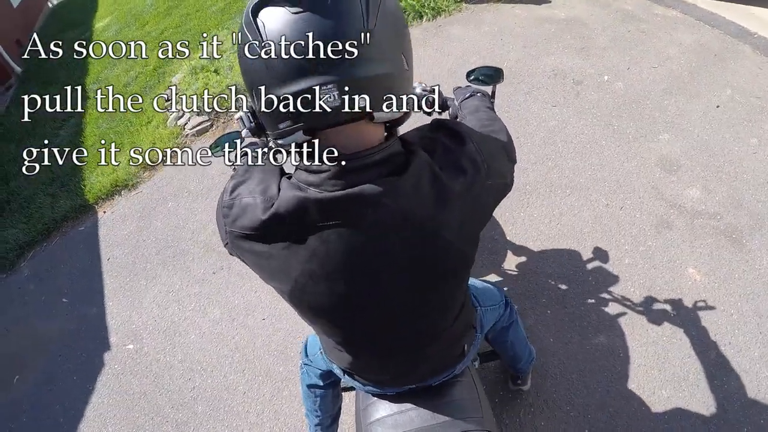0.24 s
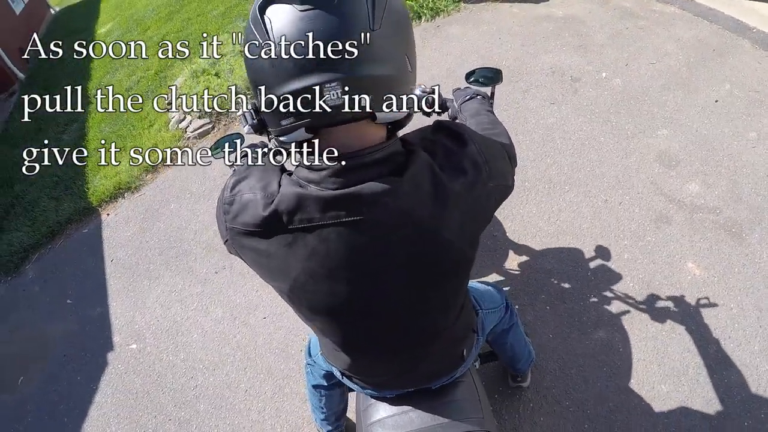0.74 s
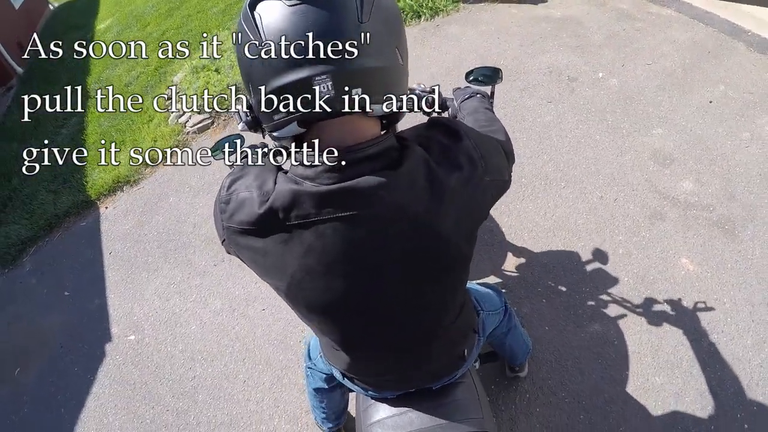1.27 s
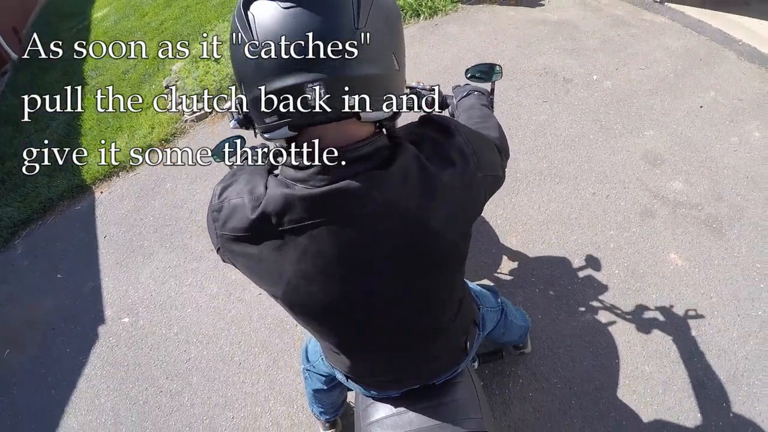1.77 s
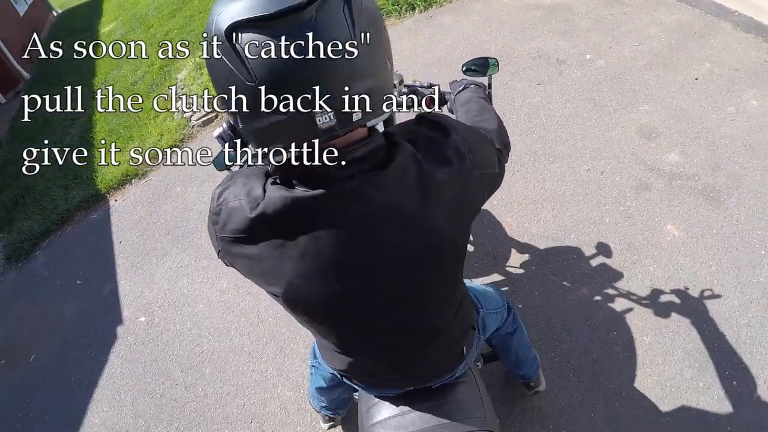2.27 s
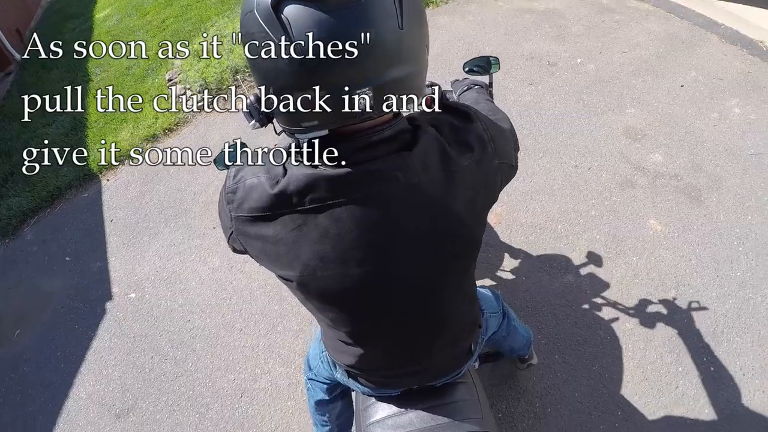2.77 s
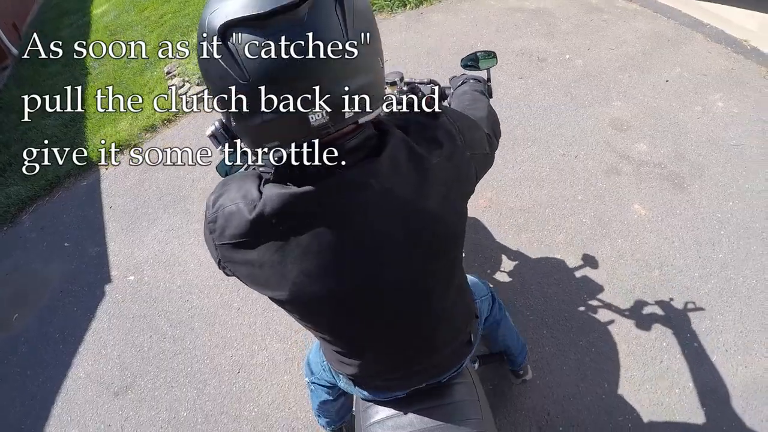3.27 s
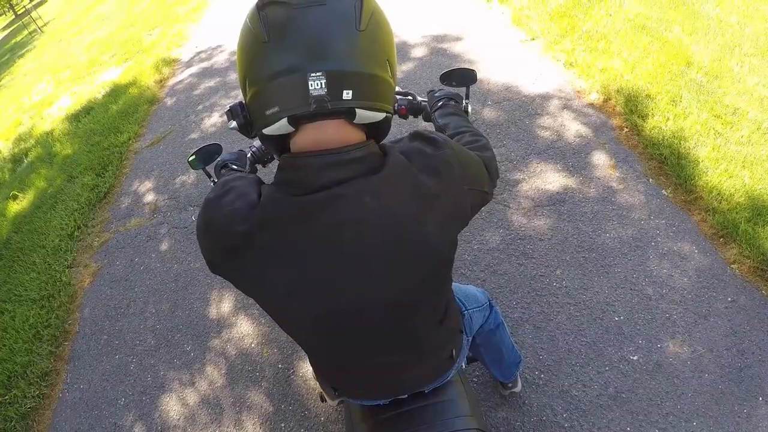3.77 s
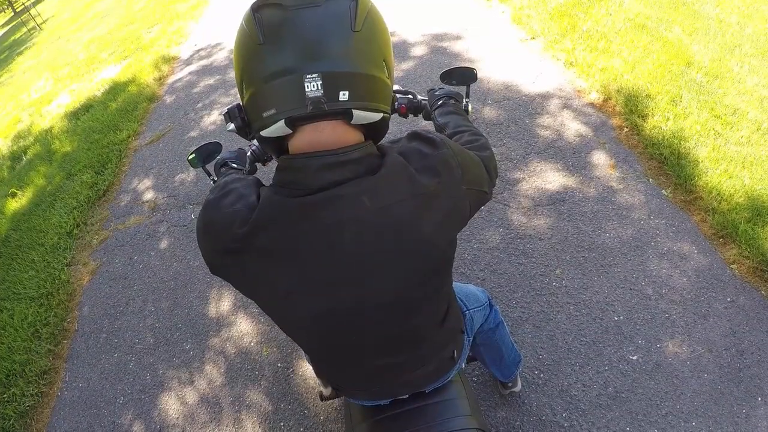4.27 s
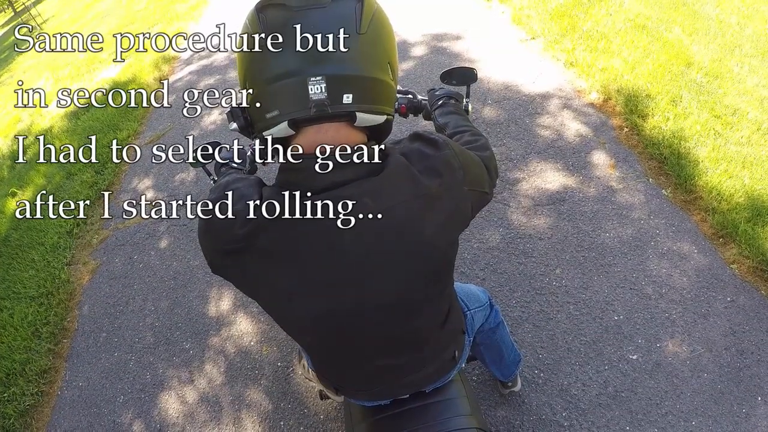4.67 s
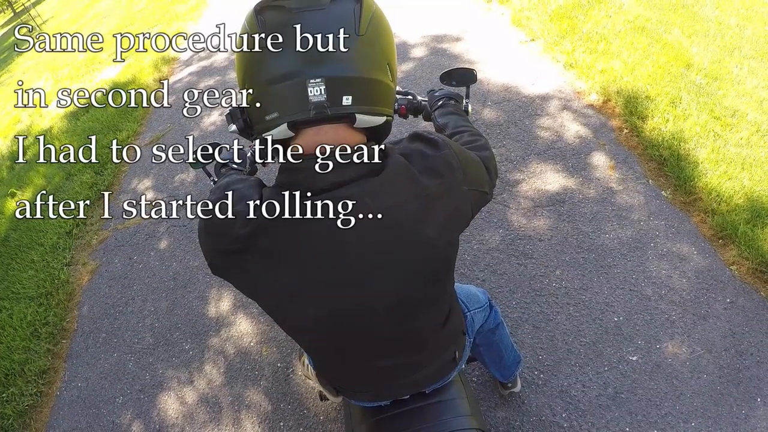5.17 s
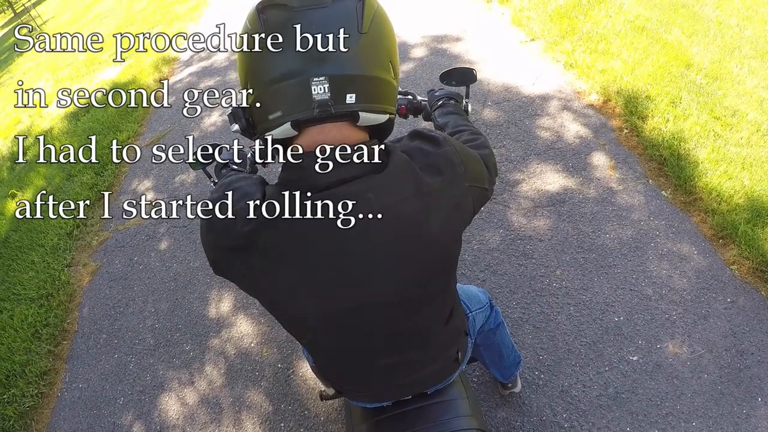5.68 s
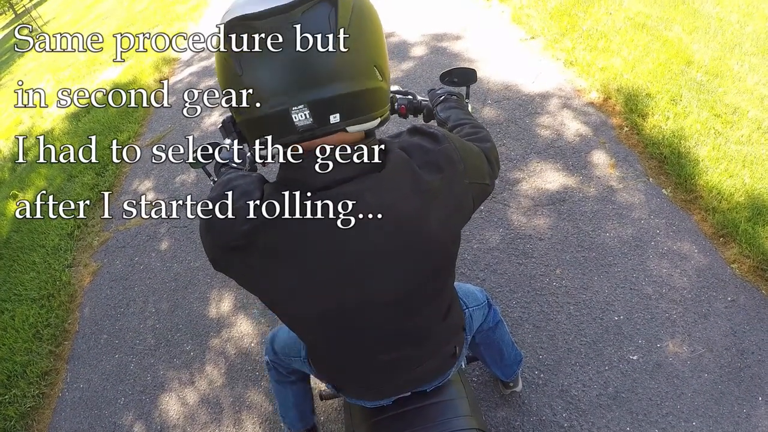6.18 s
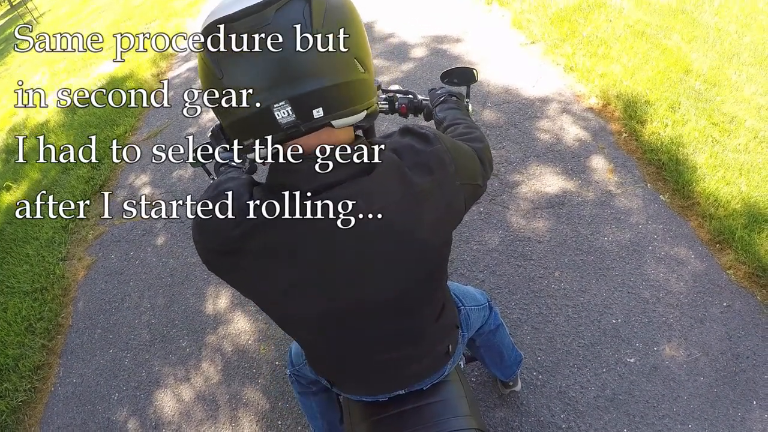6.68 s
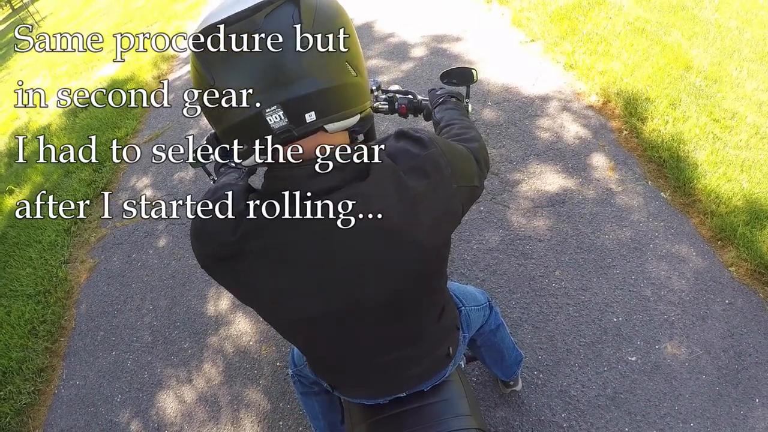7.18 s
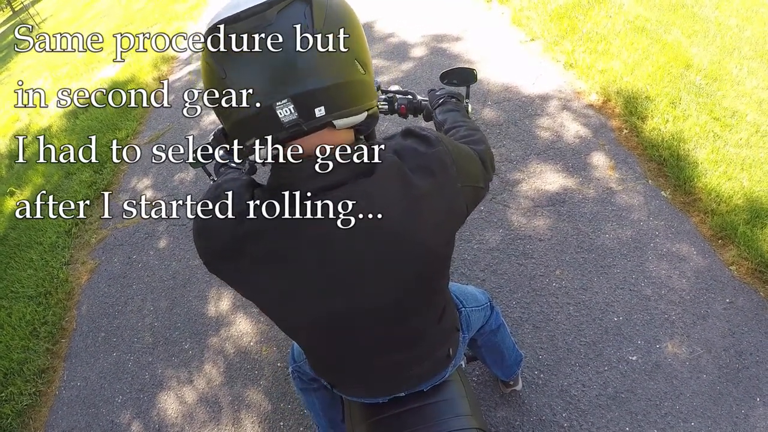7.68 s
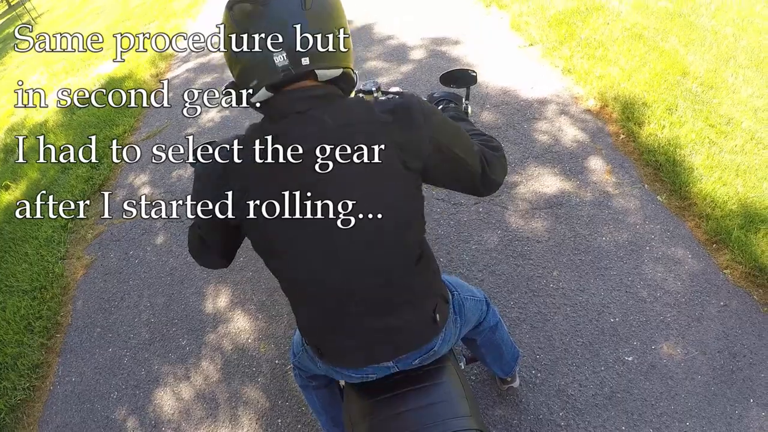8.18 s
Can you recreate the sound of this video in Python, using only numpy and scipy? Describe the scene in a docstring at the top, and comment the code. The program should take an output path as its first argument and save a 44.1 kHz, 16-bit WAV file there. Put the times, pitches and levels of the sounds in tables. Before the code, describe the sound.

Outdoors, a nearby motorcycle engine runs at a loud, lumpy idle, its low exhaust beats mixed with knocking and chain and valve clatter. It stops suddenly, leaving a much quieter stretch of coasting on asphalt, with soft tyre noise and low wind on the microphone. A handful of metallic gear clunks follow, one clearly harder than the rest, while distant birds whistle and trill. A few light, dry clicks come last.

```python
"""On an asphalt drive, a twin-cylinder motorcycle that has just caught idles lumpily, missing now and then.
Each firing excites the resonances of the exhaust; knocks, chain and valve gear set the metal ringing.
The scene cuts to the same machine rolling down the drive with its engine off: air rumbles on the
microphone, the tyres hiss softly, the gear lever clunks, birds call far off and the controls click."""
import sys
import numpy as np
from scipy import signal
from scipy.fft import rfft, irfft
from scipy.io import wavfile

SR = 44100
rng = np.random.default_rng(int(sys.argv[2]) if len(sys.argv) > 2 else 0)


def bounce(signal):
    """Save signal as a 16-bit WAV file at the path given by the first command-line argument."""
    frames = np.transpose(np.atleast_2d(signal))
    limited = np.clip(frames, -1, 1)
    pcm = np.round(limited * 32767).astype(np.int16)
    wavfile.write(sys.argv[1], SR, pcm)


N = 371746
CUT_S = 3.4802  # idling gives way to rolling
TIME = np.arange(N) / SR
BLOW = np.arange(16384) / SR  # time since a blow [s]

# The two cylinders, the weaker first:
# (thump level [dB], lag [s], moment of the drive's knock [share of stroke], knock over clatter [dB])
CYLINDERS = [(-3, .0016, .485, 21.5), (-1.4, .0005, .41, 16)]
# The engine gathers strength: (time [s], level [dB])
EFFORT = [(0, -1), (.4, -1), (1.6, 0.2), (1.9, 0.5)]
# Clatter of chain and valve gear: (time [s], level [dB])
CLATTER_LEVEL = [(.27, -52), (.36, -46), (.62, -48.5), (.8, -45.5), (3.45, -45)]
# Spectrum of the dead, non-resonant part of a blow: (frequency [Hz], relative level [dB])
THUD_SPECTRUM = [(150, 3), (450, 4), (1100, 3), (1600, 3.5), (2400, 7), (3000, -3.5), (3600, -8),
                 (4200, -21), (5800, -16.5), (8000, -30.5), (15000, -27.5)]


def amp(db):
    """Amplitude ratio: tenfold for every 20 dB."""
    return 10 ** (np.asarray(db) / 20)


def unit_rms(x):
    """Normalisation to a mean power of 1."""
    return x / np.sqrt(np.mean(x ** 2) + 1e-20)


def level(rows):
    """Gain envelope interpolated through (time [s], level [dB])."""
    return amp(np.interp(TIME, *np.transpose(rows)))


def add(mix, s, sound):
    """Superposition: a sound joins the mix at time s."""
    start = round(s * SR)
    sound = sound[max(-start, 0):]
    part = mix[max(start, 0):][:len(sound)]
    part += sound[:len(part)]


def excite(response, x):
    """A linear system driven by x: convolution with its impulse response, scaled to unit energy."""
    return signal.oaconvolve(x, response / np.linalg.norm(response))[:len(x)]


def colour(x, spectrum):
    """Minimum-phase filter of mean power gain 1, shaped by (frequency [Hz], relative level [dB])."""
    hz, db = np.transpose(spectrum)
    bin_hz = abs(np.fft.fftfreq(8192, 1 / SR))
    log_gain = np.log(amp(np.interp(np.log(bin_hz + 1), np.log(hz), db)))
    response = np.fft.ifft(np.exp(np.conj(signal.hilbert(log_gain)))).real
    return excite(response[:len(bin_hz) // 2], x)


def cutoff(x, hz, kind="low", order=2):
    """Butterworth filter: a flat passband that rolls off beyond hz."""
    return signal.sosfilt(signal.butter(order, hz, kind, fs=SR, output="sos"), x)


def bell_db(hz, centre, octaves):
    """Resonance-like hump, 6 dB down at the given octaves from its centre."""
    return -20 * np.log10(1 + (np.log2(hz / centre) / octaves) ** 2)


def band(x, centre, octaves):
    """Band-pass filtering by a bell-shaped spectrum."""
    hz = np.geomspace(100, 16000, 30)
    return colour(x, np.transpose([hz, bell_db(hz, centre, octaves)]))


def wander(hz):
    """Random fluctuation of rms 1: noise low-passed at hz."""
    spectrum = rfft(rng.standard_normal(N)) / (1 + (np.fft.rfftfreq(N, 1 / SR) / hz) ** 4)
    return unit_rms(irfft(spectrum, N))


def grainy_noise(depth_db, hz):
    """Random amplitude modulation gives white noise a grain."""
    return unit_rms(rng.standard_normal(N) * amp(depth_db * wander(hz)))


def burst(rise_s, decay_s):
    """A noise transient that swells, then decays exponentially."""
    return rng.standard_normal(len(BLOW)) * (1 - np.exp(-BLOW / rise_s)) * np.exp(-BLOW / decay_s)


def ring(hz, db, t60, glide=0):
    """Free decay of one damped mode, whose pitch rises by the fraction glide."""
    cycles = hz * (BLOW + glide * (BLOW - .03 * (1 - np.exp(-BLOW / .03))))
    return amp(db - 60 * BLOW / t60) * np.cos(2 * np.pi * cycles)


def strike(modes, contact_s, vary_db):
    """Impact excitation: modes swell during contact, then decay freely; no two blows are alike."""
    hz, db, t60 = np.transpose(modes)[:, :, None]
    strength, detune, phase = rng.standard_normal((3, len(modes), 1))
    t = BLOW[:len(BLOW) // 2]
    swell = np.sin(np.pi / 2 * np.minimum(t / contact_s, 1)) ** 2
    decay = amp(db + vary_db * strength - 60 * np.maximum(t - contact_s, 0) / t60)
    tones = np.sin(2 * np.pi * (hz * (1 + .008 * detune) * t + phase))
    return np.pad((swell * decay * tones).sum(0), (0, len(t)))


def crank():
    """Phase is the integral of rate: returns time and the count of strokes made by then."""
    # The idle hunts, then settles: (time [s], firing rate [1/s])
    speed = [(-0.045, 17.26), (0.05, 13.08), (0.14, 15.83), (0.26, 11.59), (0.37, 16.21), (0.55, 15.57),
             (0.62, 14.57), (0.87, 14.85), (0.97, 15.71), (1.13, 15.14), (1.25, 16.76), (1.39, 14.11),
             (1.48, 15.68), (2.0, 15.58), (2.2, 15.73), (3.48, 15.8)]
    t = np.arange(speed[0][0], N / SR, 1 / SR)
    return t, np.cumsum(np.interp(t, *np.transpose(speed))) / SR


def firings(spread_db=0.62):
    """Pulse train of two alternating cylinders: (time [s], stroke length [s], cylinder, level [dB])."""
    # The weaker cylinder misses, or fires extra hard: (time [s], level [dB])
    stumbles = [(.228, -6), (.375, 0.9), (.633, -13.5), (.768, 1.8), (1.033, -0.1), (1.286, -0.3),
                (1.421, -6), (1.549, 0.6), (1.678, -6.5), (1.932, -6), (2.315, -4.5), (2.569, -7.5),
                (2.951, -8.5), (3.331, -6.5)]
    t, count = crank()
    starts = np.interp(np.arange(np.interp(CUT_S, t, count) + 1), count, t)
    strokes = []
    for k, (s, length) in enumerate(zip(starts, np.diff(starts))):
        usual_db, lag = CYLINDERS[k % 2][:2]
        db = next((odd_db for at, odd_db in stumbles if abs(at - s) < length / 2), usual_db)
        db += np.interp(s, *np.transpose(EFFORT)) + spread_db * rng.standard_normal()
        strokes.append((s + lag, length, k % 2, db))
    return strokes


def exhaust(strokes, puff_s=0.00072):
    """Pipe resonance: a valve ticks, gas spits, then a pressure pulse rings the pipe as turbulence rasps."""
    # Pipe and silencer: (frequency [Hz], level [dB], T60 [s], pitch rise as hot gas arrives [fraction])
    pipe_modes = [(54, -47.5, 0.74, 0), (59.3, -4, 0.23, 0), (91.8, -8.5, 0.14, 0.055),
                  (125.8, -23, 0.5, 0.013), (152, -26, 0.21, 0), (223.9, -14, 0.31, 0.101),
                  (320.8, -27.5, 0.28, 0.071)]
    # Turbulence in the pipe: (frequency [Hz], relative level [dB])
    rasp_spectrum = [(60, -54.5), (130, -9.5), (260, 2.5), (420, -4), (600, -14), (1200, -25.5),
                     (3000, -52.5)]
    # Spitting gas: (frequency [Hz], relative level [dB])
    gas_spectrum = [(800, -20), (2400, -4), (3000, 3), (4100, -10), (5500, 0), (7600, -1), (9000, -8),
                    (10500, -5), (12000, -13), (14000, -10), (15500, -20)]
    # A valve closing: (frequency [Hz], level [dB], T60 [s])
    valve_modes = [(2833, 1, 0.03), (3053, -2, .022), (3324, -5.5, .02), (6200, -12, .03)]
    # Lighter valve ticks in the stronger cylinder's stroke: (moment [share of stroke], level [dB])
    tappets = [(.19, -56), (.61, -56.5)]
    pipe, rasp, gas, valves = np.zeros((4, N))
    for s, length, cylinder, db in strokes:
        ringing = sum(amp(2 * rng.standard_normal()) * ring(*mode) for mode in pipe_modes)
        add(pipe, s - .001, amp(db) * ringing)
        effort_db = np.interp(s, *np.transpose(EFFORT))
        add(rasp, s, amp(db + effort_db) * burst(0.0017, 0.13))
        spit_db = max(3 + 3.1 * db, -18)  # grows faster than the thump; even a miss spits
        spit = burst(0.0015, 0.0019) + amp(-13.5) * burst(0.0015, 0.019)
        add(gas, s - .0035, amp(spit_db) * spit)
        tick_db = -49 + spit_db / 2 + 4 * rng.standard_normal()
        add(valves, s - .005, amp(tick_db) * strike(valve_modes, contact_s=0.0024, vary_db=1.4))
        for share, tappet_db in tappets if cylinder else []:
            tick = strike(valve_modes, contact_s=0.0042, vary_db=1.9)
            add(valves, s + share * length, amp(tappet_db) * tick)
    puff = BLOW ** 2 * np.exp(-BLOW / puff_s)  # the valve opens gradually
    thumps = -signal.oaconvolve(pipe, puff / puff.sum())[:N]
    thumps = cutoff(thumps, hz=450)  # the silencer rounds the edge
    flow_noise = amp(-37) * colour(rasp, rasp_spectrum) + amp(-43) * colour(gas, gas_spectrum)
    return amp(0.66) * thumps + flow_noise + valves


def knock_times(strokes, spread_db=0.5):
    """Backlash: the drive knocks as the crank slows in each stroke. Returns (time [s], level [dB])."""
    # Now and then the slack is taken up with a bang: (time [s], level [dB])
    hard_knocks = [(.275, -21), (.407, -25.5), (1.065, -18.5), (1.190, -21.5), (1.451, -22.5), (1.837, -22),
                   (1.966, -18.5), (2.530, -24.5), (2.730, -19.5), (2.787, -23.5), (2.856, -18.5),
                   (2.908, -24.5), (3.110, -20), (3.236, -21)]
    knocks = list(hard_knocks)
    for s, length, cylinder, _ in strokes:
        share, over_db = CYLINDERS[cylinder][2:]
        at = s + share * length
        db = np.interp(at, *np.transpose(CLATTER_LEVEL)) + over_db + spread_db * rng.standard_normal()
        if all(abs(at - hard_s) > length / 2 for hard_s, _ in hard_knocks):
            knocks.append((at, db))
    return knocks


def drive_knocks(strokes, bounce_s=.008, bounce_db=-8.5):
    """Impact and rebound: each knock thuds and rings, then the parts touch again more softly."""
    # Ringing of a knock: (frequency [Hz], level [dB], T60 [s])
    knock_modes = [(426, -16, 0.06), (694.4, -2, 0.071), (690.3, -6, 0.04), (847, -16, 0.042),
                   (1118, -11.5, 0.039), (1557, -21.5, 0.12), (2366, -20, 0.019), (3750, -39.5, 0.05)]
    rings, thuds = np.zeros((2, N))
    for s, db in knock_times(strokes):
        add(rings, s - .001, amp(db) * strike(knock_modes, contact_s=0.0057, vary_db=1.3))
        rebound_s = s + bounce_s * (.5 + rng.random())
        add(rings, rebound_s, amp(db + bounce_db) * strike(knock_modes, contact_s=0.005, vary_db=2.4))
        add(thuds, s, amp(db) * burst(0.0018, 0.025))
    return amp(-1) * rings + amp(-25) * colour(thuds, THUD_SPECTRUM)


def clatter(swing_db=1.5, peak_share=0.57):
    """Forced vibration: rattling chain and valve gear ring the engine cases, under a gritty whirr."""
    # Engine cases: (frequency [Hz], relative level [dB], T60 [s])
    case_modes = [(343.4, 4, 0.21), (469, -3, 0.2), (616, -1.5, 0.14), (715.4, 5, 0.12), (868, -14.5, 0.12),
                  (1133, -9, 0.26), (1312, -21.5, 0.072), (1464, -15, 0.16), (2333, -10.5, 0.08),
                  (2774, -17.5, 0.18), (3655, -15, 0.1)]
    # Non-resonant part of the rattle: (frequency [Hz], relative level [dB])
    rattle_spectrum = [(200, -6), (400, 0), (900, -2), (1400, -6), (2400, -8), (3000, -11), (3750, -15),
                       (4200, -25), (8000, -50)]
    # Hiss of the moving parts: (frequency [Hz], relative level [dB])
    whirr_spectrum = [(2000, -6), (3600, -4), (4100, -9), (4800, 0), (6400, 1), (7000, -5), (9000, -11),
                      (10400, -9), (11700, -16), (14000, -15), (15500, -25)]
    running = level(CLATTER_LEVEL)
    stroke_count = np.interp(TIME, *crank())
    swing = amp(swing_db * np.cos(2 * np.pi * (stroke_count - peak_share)))  # one swell a stroke
    rattle = running * swing * grainy_noise(depth_db=1, hz=116)
    cases = cutoff(sum(ring(*mode) for mode in case_modes), hz=3800, order=8)  # they pass little treble
    metal = excite(cases, rattle) + amp(-5.5) * colour(rattle, rattle_spectrum)
    whirr = running * colour(grainy_noise(depth_db=3, hz=70), whirr_spectrum)
    return amp(6) * metal + amp(-16) * whirr


def thin_metal():
    """Narrow resonances: thin metal, probably the cooling fins, rings on, swelling and fading at random."""
    # Resonances: (frequency [Hz], width [Hz], level relative to the clatter [dB])
    resonances = [(1556, 24, -10), (1830, 30, -15)]
    tones = np.zeros(N)
    for hz, width, db in resonances:
        envelope = wander(width) + 1j * wander(width)
        tones += amp(db) * (envelope * np.exp(2j * np.pi * hz * TIME)).real
    return level(CLATTER_LEVEL) * tones


def wind():
    """Turbulent pressure: air rumbles on the microphone over a faint, steady hiss."""
    # Open air and wind: (frequency [Hz], relative level [dB])
    air_spectrum = [(20, -5), (50, 1.5), (110, -4.5), (170, -10), (300, -13.5), (700, -32.5), (1100, -30.5),
                    (1500, -40.5), (3000, -38.5), (5500, -44), (8000, -48.5), (15000, -54)]
    # Strength of the rumble: (time [s], level [dB])
    rumble_level = [(3.52, -40.5), (5.7, -43), (7.7, -44.5), (8.0, -42.5)]
    air = colour(rng.standard_normal(N), air_spectrum)
    rumble = level(rumble_level) * cutoff(air, hz=220)
    hiss = amp(-45) * cutoff(air, hz=220, kind="high")
    return rumble + hiss


def tyres():
    """Rolling noise: gritty asphalt excites the tyres, more loudly with speed."""
    # Tyres on asphalt: (frequency [Hz], relative level [dB])
    tyre_spectrum = [(120, 4.5), (250, -0.5), (320, -3.5), (450, -4), (750, -5), (1000, -11.5),
                     (1400, -28.5), (3000, -33.5), (8000, -41)]
    # The noise follows the speed: (time [s], level [dB])
    rolling_level = [(3.48, -49), (3.9, -51.5), (4.5, -52.5), (5.0, -50), (5.7, -53.5), (6.8, -50),
                     (7.05, -46.5), (7.4, -50), (8.43, -49)]
    return level(rolling_level) * colour(grainy_noise(depth_db=2, hz=24), tyre_spectrum)


def gearbox(shudder_s=4.912):
    """Modal ringing: lever and gear dogs chatter against the gearbox; the hardest blow rocks the frame."""
    # Blows of the gear change: (time [s], level [dB], time scale of chatter [s], strongest band [Hz])
    clunks = [(3.583, -52.5, 0.011, 700), (3.6386, -39.5, 0.017, 636), (3.6518, -41.5, 0.01, 790),
              (3.6943, -29, 0.0062, 850), (4.0716, -38, 0.02, 1500), (4.1326, -33.5, 0.015, 1440),
              (4.807, -57, 0.0031, 1090), (4.883, -33, 0.0061, 1140), (4.9062, -19, 0.0064, 2330),
              (5.0349, -47, 0.0045, 895), (5.0532, -44, 0.0044, 1230), (5.1262, -51.5, 0.0046, 1010),
              (5.1516, -45.5, 0.0066, 925), (5.3417, -43.5, 0.0017, 945), (5.3884, -32.5, 0.0041, 1460),
              (5.908, -45, 0.0022, 1170)]
    # Gearbox: (frequency [Hz], level [dB], T60 [s])
    gear_modes = [(415, -5.5, 0.11), (507, -10, 0.17), (677, -0.5, 0.1), (729, 0, 0.094), (840, -10, 0.11),
                  (1110, 0, 0.058), (1252, -8, 0.1), (1570, -14, 0.091), (1886, -11, 0.087),
                  (2080, -41, 0.028), (2326, 1.5, 0.021), (2670, -13, 0.015), (3380, -36, 0.21),
                  (5080, -24, 0.12), (5400, -27, 0.055)]
    rings, thuds = np.zeros((2, N))
    for s, db, chatter_s, focus_hz in clunks:
        modes = [(hz, mode_db + bell_db(hz, focus_hz, 0.86), t60) for hz, mode_db, t60 in gear_modes]
        add(rings, s - .001, amp(db) * strike(modes, contact_s=0.65 * chatter_s, vary_db=1.3))
        add(thuds, s - .001, amp(db) * band(burst(0.00056, 1.45 * chatter_s), focus_hz, octaves=3.7))
    blows = rings + amp(-6) * colour(thuds, THUD_SPECTRUM)
    blows += amp(-20) * excite(burst(0.0035, 0.062), blows)  # the rest of the machine rings on
    shudder = ring(hz=42.7, db=-23.5, t60=0.54) * (1 - np.exp(-BLOW / 0.012))
    add(blows, shudder_s, shudder)
    return blows


def birds(waver=0.017, trill_hz=6280, trill_db=-69, trill_buzz=0.042):
    """Frequency modulation: far birds give arching whistles and two buzzy trills, scattered by trees."""
    # Whistles: (time [s], length [s], start pitch [Hz], end pitch [Hz], level [dB])
    whistles = [(3.77, 0.054, 1750, 1620, -68), (3.798, .033, 5850, 5270, -70),
                (3.886, 0.37, 3550, 3430, -80), (4.165, 0.069, 2300, 2210, -63),
                (4.276, 0.025, 3550, 2700, -66), (5.287, 0.062, 2730, 2710, -69),
                (5.452, 0.05, 1670, 1580, -67), (5.593, .068, 3150, 3030, -72),
                (5.808, 0.099, 3550, 3500, -62), (5.87, .032, 3620, 2800, -66),
                (5.98, .094, 3640, 3580, -70), (6.034, 0.062, 3510, 2760, -72),
                (6.575, 0.17, 2680, 3330, -73), (6.902, .18, 2920, 3400, -73), (7.1, 0.19, 2750, 3330, -73),
                (7.123, 0.029, 1630, 1630, -64), (7.438, .068, 4060, 3860, -70),
                (7.725, 0.042, 4500, 3760, -64), (7.943, .029, 4720, 4050, -67),
                (8.018, 0.031, 2970, 2680, -63.5)]
    # Another bird's trills: (time [s], length [s])
    trills = [(7.31, 0.264), (7.553, .15)]
    calls, flutter = np.zeros(N), wander(390)
    notes = [(*row, waver) for row in whistles]
    notes += [(s, length, trill_hz, trill_hz, trill_db, trill_buzz) for s, length in trills]
    for s, length, start_hz, end_hz, db, depth in notes:
        progress = np.linspace(0, 1, int(length * SR))
        arch = abs(np.sin(np.pi * progress))
        glide_hz = end_hz - start_hz
        hz = start_hz + glide_hz * progress + arch * (0.0126 * start_hz + 0.152 * abs(glide_hz))
        hz *= 1 + depth * np.roll(flutter, -int(s * SR))[:len(hz)]
        add(calls, s, amp(db) * np.sqrt(2 * arch) * np.sin(2 * np.pi * np.cumsum(hz) / SR))
    trees = burst(.008, .05)
    return calls + amp(-3) * excite(trees, calls)


def controls(tail_db=-17):
    """Damped light impacts: each control clicks drily in its own band, with a short tail."""
    # Clicks: (time [s], level [dB], centre [Hz], half-width [octaves], decay [s])
    clicks = [(7.794, -46, 11500, 0.56, 0.0022), (7.8033, -36, 2750, 0.42, 0.0022),
              (7.808, -40.5, 660, 0.36, 0.025), (7.822, -41, 4500, 0.92, 0.0011),
              (8.2474, -43.5, 2740, 0.35, 0.026), (8.4014, -49, 2940, 0.34, .011)]
    mix = np.zeros(N)
    for s, db, centre, octaves, decay_s in clicks:
        click = burst(0.00063, decay_s) + amp(tail_db) * burst(0.0024, 4 * decay_s)
        add(mix, s - .001, amp(db) * band(click, centre, octaves))
    return mix


def scene():
    """Sources superpose in mono: the idling engine, then at once the quiet roll."""
    strokes = firings()
    idling = exhaust(strokes) + drive_knocks(strokes) + clatter() + thin_metal()
    rolling = wind() + tyres() + gearbox() + birds() + controls()
    return np.where(TIME < CUT_S, idling, rolling)[None]


def record(dry):
    """Band limiting: the microphone passes 9 Hz to 15.5 kHz."""
    dry = cutoff(dry, hz=9, kind="high", order=1)
    low_pass = signal.firwin(511, 15500, window=("kaiser", 9), fs=SR)
    return signal.oaconvolve(dry, low_pass[None], "same")


dry = scene()
out = record(dry)
bounce(out)
```